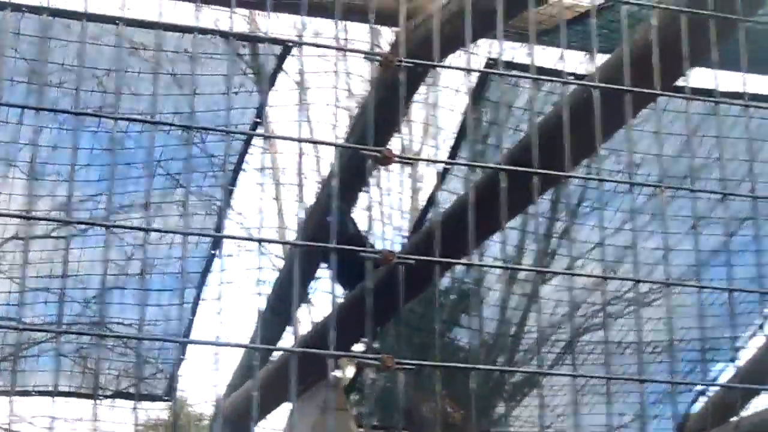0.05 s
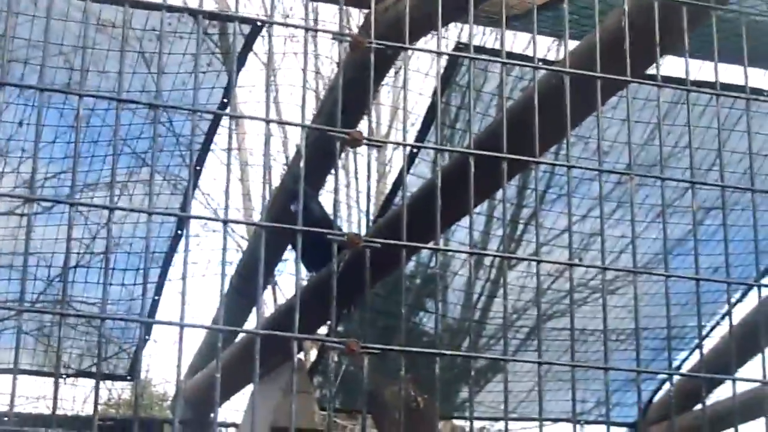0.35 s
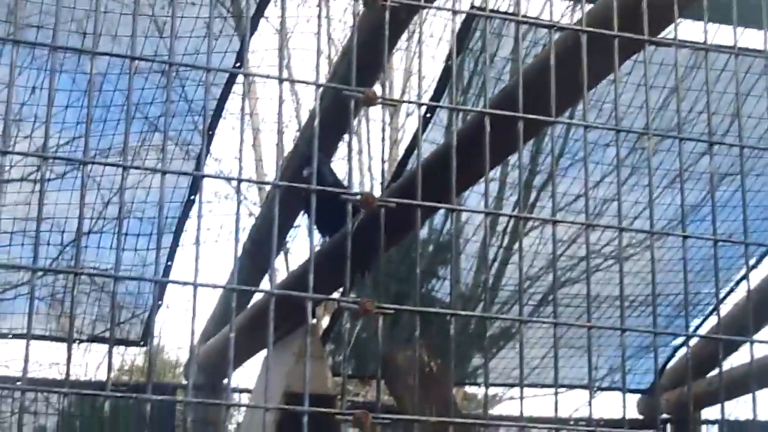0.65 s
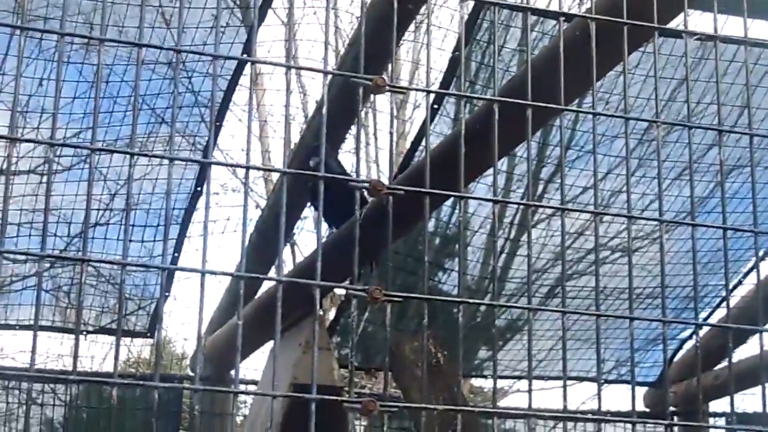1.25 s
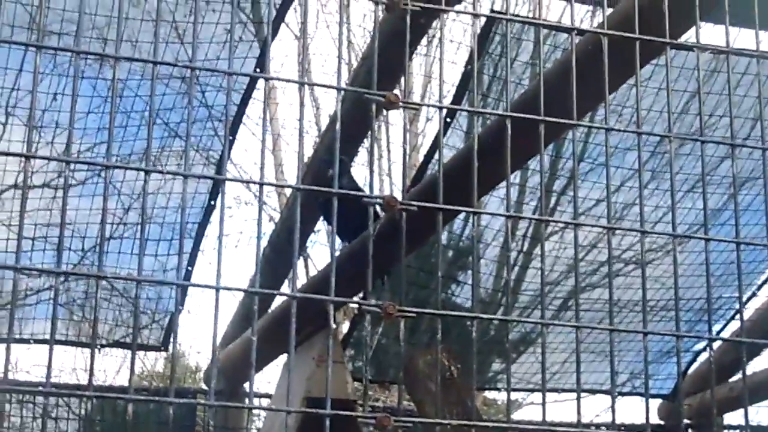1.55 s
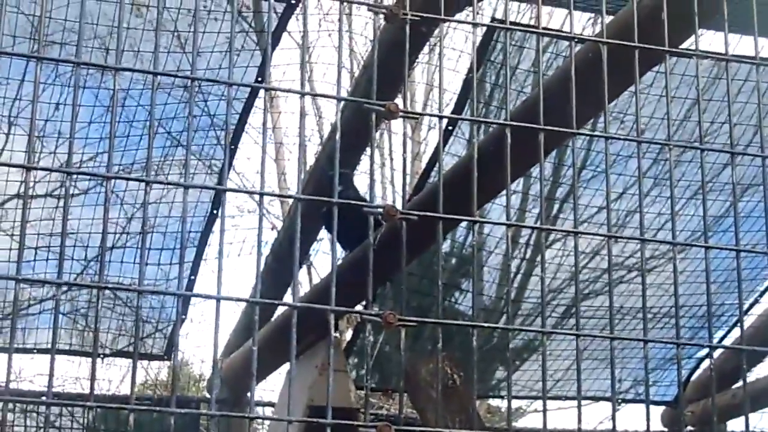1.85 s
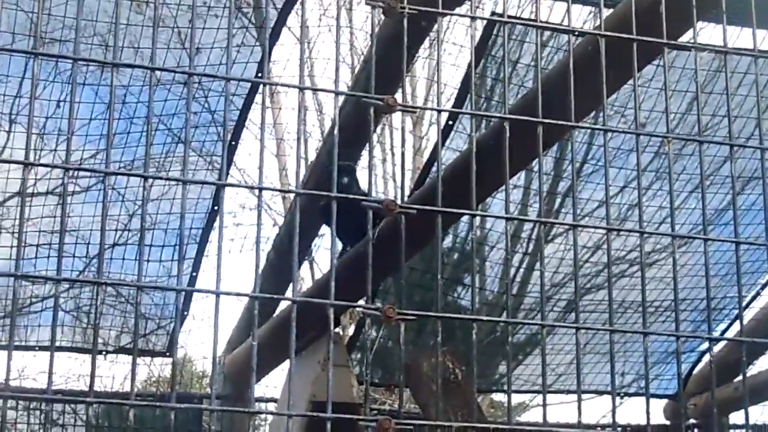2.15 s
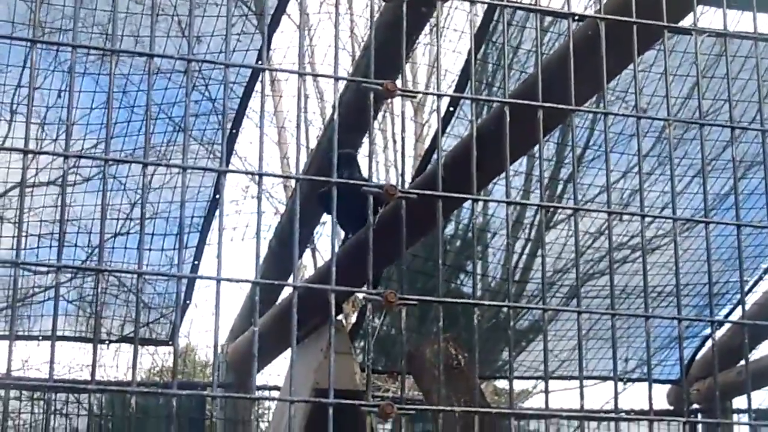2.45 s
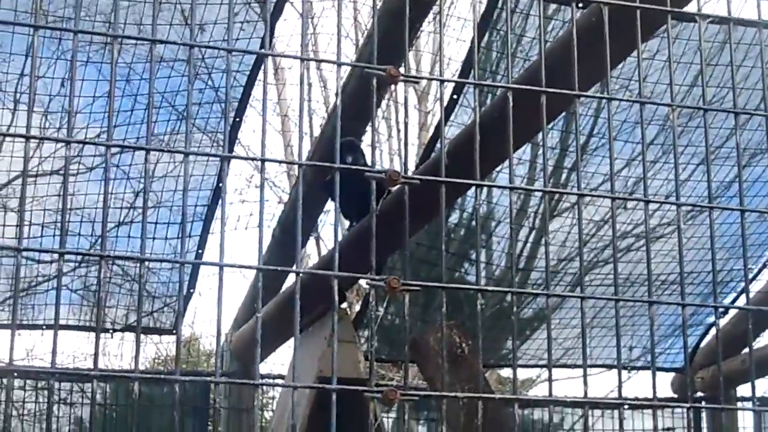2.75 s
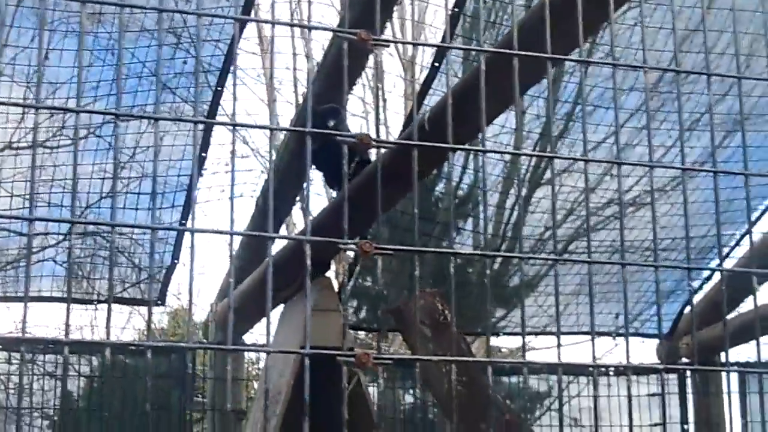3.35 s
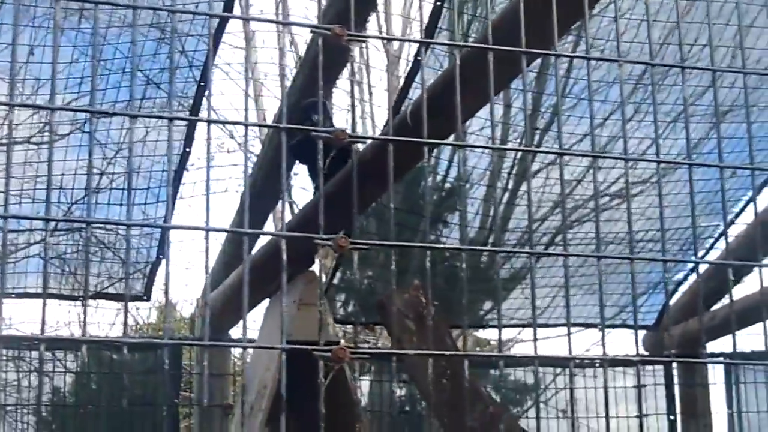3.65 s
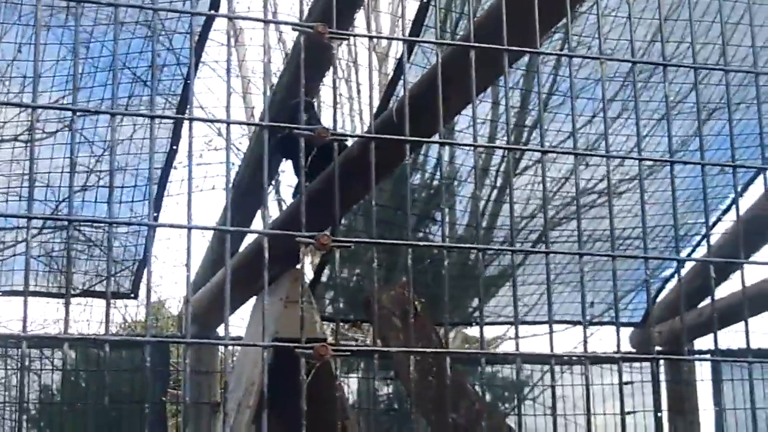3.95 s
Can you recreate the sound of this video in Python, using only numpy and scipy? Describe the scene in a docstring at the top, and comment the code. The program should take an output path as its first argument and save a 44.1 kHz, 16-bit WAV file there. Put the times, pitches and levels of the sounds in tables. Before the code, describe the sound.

A raven gives five short harsh calls outdoors over a quiet background.

```python
"""In an outdoor aviary a raven gives five abrupt, harsh barks, with three soft hoots after the third.
Each bark starts with a faint falling squeak, breaks into a rasp over a strong octave and sags in pitch:
a periodic source, coloured by throat and beak resonances. The enclosure answers with brief reflections.
Beneath lie a quiet hush, faint ticks, one rustle and light wind bumping the microphone."""
import sys
import numpy as np
from scipy import signal
from scipy.fft import rfft, irfft, next_fast_len
from scipy.io import wavfile
from scipy.ndimage import map_coordinates

SR = 44100
rng = np.random.default_rng(int(sys.argv[2]) if len(sys.argv) > 2 else 0)


def materialize(psi):
    """Save the field psi as 16-bit PCM at rate SR to the path in sys.argv[1].

    A 1-D psi becomes a single channel; in a 2-D psi each row is a channel.
    """
    bounded = np.clip(np.atleast_2d(psi).T, -1, 1)
    quanta = np.round(bounded * 32767).astype(np.int16)
    wavfile.write(sys.argv[1], SR, quanta)


N = 176400
TIME = np.arange(N) / SR
BAND_LIMIT_HZ = 14400


def amp(db):
    """Decibels as an amplitude ratio."""
    return 10 ** (np.asarray(db) / 20)


def unit_rms(x):
    """Normalisation to unit power."""
    return x / np.sqrt(np.mean(x ** 2) + 1e-20)


def along(points, hz):
    """Interpolation on a logarithmic frequency axis."""
    knots_hz, values = np.transpose(points)
    return np.interp(np.log(hz + 1), np.log(knots_hz + 1), values)


def wobble(rate, size):
    """Smooth random modulation with `rate` knots a second."""
    return map_coordinates(rng.standard_normal(4096), [np.arange(size) * rate / SR], mode="wrap")


def filtered(x, response):
    """Linear filtering: the spectrum times a frequency response."""
    n = x.shape[-1]
    padded = next_fast_len(n + 8192)
    return irfft(rfft(x, padded) * response(np.fft.rfftfreq(padded, 1 / SR)), padded)[..., :n]


def add(track, start_s, sound):
    """Superposition of a sound on a track."""
    part = track[..., max(round(start_s * SR), 0):][..., :sound.shape[-1]]
    part += sound[..., :part.shape[-1]]


def pan(db):
    """Stereo gains for a level difference, left minus right."""
    return amp(np.array([[db], [-db]]) / 2)


def envelope(t, attack_s, hold_s, release_s, droop_db=0):
    """A smooth rise, a drooping hold, then exponential decay of a further 20 dB per release time."""
    rise = np.sin(np.pi / 2 * np.clip(t / attack_s, 0, 1)) ** 2
    return rise * amp(-droop_db * t / hold_s - 20 * np.maximum(t - hold_s, 0) / release_s)


def coloured_noise(size, response):
    """Spectrally shaped white noise of unit power."""
    return unit_rms(filtered(rng.standard_normal(size), response))


def stereo_noise(response, coherence):
    """Partially coherent noise: the balance of mid and side sets the left-right correlation."""
    angle = lambda hz: np.arccos(np.clip(along(coherence, hz), -1, 1)) / 2
    white = rng.standard_normal((2, N))
    mid, side = filtered(white, lambda hz: response(hz) * [np.cos(angle(hz)), np.sin(angle(hz))])
    return unit_rms(np.array([mid + side, mid - side]))


HUSH_SPECTRUM = [(120, -5.5), (200, -7), (320, -5.5), (430, -7.5), (520, -3.5), (640, -8), (800, -8),
                 (1440, -16.5), (3090, -21), (7000, -25.5), (14000, -28)]  # ambient spectrum: frequency_hz, gain_db
HUSH_DRIFT = [(0, -46.5), (.6, -46.5), (1.3, -48), (3.1, -47.5), (4, -49)]  # slow ambient drift: time_s, level_db
HUSH_COHERENCE = [(200, 0.85), (1000, 0.88), (4000, 0.25), (12000, 0.1)]  # left-right likeness: frequency_hz, correlation
def hush():
    """Distant outdoor noise, nearly steady, whose coherence falls in the treble."""
    response = lambda hz: amp(along(HUSH_SPECTRUM, hz)) * hz ** 2 / (hz ** 2 + 130 ** 2)
    level_db = np.interp(TIME, *np.transpose(HUSH_DRIFT)) + 0.56 * wobble(6.83, N)
    return amp(level_db) * stereo_noise(response, HUSH_COHERENCE) * pan(-1.9)


RUMBLE_SPECTRUM = [(15, -6.5), (30, 4), (70, 1.5), (130, -6.5), (250, -14), (600, -51)]  # wind spectrum: frequency_hz, gain_db
RUMBLE_SWELL = [(0, -47.5), (.8, -44), (2.0, -41), (2.9, -47), (3.4, -45.5), (4, -37.5)]  # wind strength: time_s, level_db
WIND_BUMPS = [(0.871, 0.02, -40, 138, -6), (0.937, 0.036, -45.5, 170, -14.5),
              (1.157, 0.036, -33.5, 142, -9), (1.269, 0.024, -29.5, 187, -5.5),
              (1.636, 0.042, -43, 141, -13), (1.822, 0.023, -36, 160, -5), (1.909, 0.022, -39.5, 148, -12),
              (2.303, 0.006, -30.5, 194, -16), (3.294, 0.0095, -40.5, 121, 23),
              (3.545, 0.026, -33.5, 121, -13.5), (3.656, 0.026, -40, 167, -12.5)]  # pressure pulses: centre_s, length_s, level_db, cutoff_hz, pan_db
def wind():
    """Turbulent pressure on the microphone makes an uneven rumble and short low bumps."""
    level_db = np.interp(TIME, *np.transpose(RUMBLE_SWELL)) + 1.8 * wobble(12, N)
    rumble = stereo_noise(lambda hz: amp(along(RUMBLE_SPECTRUM, hz)), coherence=[(60, 0.61)])
    out = amp(level_db) * rumble * pan(-1.5)
    t = np.arange(-SR // 10, SR // 10) / SR
    for centre_s, length_s, db, cutoff_hz, pan_db in WIND_BUMPS:
        puff = 0.5 * rng.standard_normal((2, len(t))) + rng.standard_normal(len(t))
        puff *= np.exp(-(2 * t / length_s) ** 2)
        puff = filtered(puff, lambda hz: hz / (hz + 70) / np.sqrt(1 + (hz / cutoff_hz) ** 6))
        puff *= np.sqrt(length_s * SR) / np.linalg.norm(puff, axis=1, keepdims=True)
        add(out, centre_s + t[0], amp(db) * puff * pan(pan_db))
    return out


def rustle(centre_s=0.253, length_s=0.07, centre_hz=5460, level_db=-57):
    """Band-pass noise under a Gaussian envelope, heard as a faint high rustle."""
    noise = coloured_noise(N, lambda hz: 1 / (1 + ((hz - centre_hz) / 1800) ** 2))
    return amp(level_db) * noise * np.exp(-(2 * (TIME - centre_s) / length_s) ** 2)


DRY_TICKS = [(0.019, -46), (.139, -45.5), (.339, -46), (0.548, -39.5), (2.756, -46), (2.800, -42)]  # small transients: start_s, level_db
TICK_SPECTRUM = [(500, 9), (2500, 1), (5000, -7), (9000, -2), (14000, -18)]  # their spectrum: frequency_hz, gain_db
def ticks(decay_s=0.0053):
    """Exponentially damped noise bursts, heard as dry ticks."""
    out, t = np.zeros(N), np.arange(SR // 30) / SR
    for start_s, level_db in DRY_TICKS:
        noise = coloured_noise(len(t), lambda hz: amp(along(TICK_SPECTRUM, hz)))
        add(out, start_s, amp(level_db) * noise * np.exp(-t / decay_s))
    return out


REVERB_TIMES = [(200, 0.14), (550, 0.59), (1200, 0.86), (4000, 1), (8000, 0.17), (14000, 0.11)]  # decay of the enclosure: frequency_hz, t60_s
TAIL_SPECTRUM = [(200, -20), (550, 1), (1150, -3.5), (2500, -7), (4000, -12.5), (8000, 4.5), (14000, 15)]  # diffuse field: frequency_hz, gain_db
REFLECTIONS = [(.0095, -29), (.021, -22.5), (.034, -31), (.047, -22)]  # echoes off beams and walls: delay_s, gain_db
def aviary(sound, tail_gain_db=-18.5, build_up_s=0.0066, echo_cutoff_hz=4600):
    """Convolution with an impulse response: direct sound, dull early reflections and a diffuse tail."""
    hz, t, spectra = signal.stft(rng.standard_normal((2, SR * 3 // 4)), SR, nperseg=256)
    decay = amp(-60 * t / along(REVERB_TIMES, hz)[:, None])
    tail = signal.istft(spectra * decay * (1 - np.exp(-t / build_up_s)), SR, nperseg=256)[1]
    mid, side = filtered(tail / np.linalg.norm(tail[0]), lambda f: amp(along(TAIL_SPECTRUM, f)))
    side = filtered(side, lambda f: f / (f + 2500))  # the bass stays central
    echoes = np.zeros(len(mid))
    for delay_s, gain_db in REFLECTIONS:
        add(echoes, delay_s, amp([gain_db]))
    echoes = filtered(echoes, lambda f: 1 / (1 + 1j * f / echo_cutoff_hz))
    response = amp(tail_gain_db) * np.array([mid + side, mid - side]) + echoes
    response[:, 0] += 1  # direct path
    return signal.fftconvolve(sound[None], response, axes=1)


HOOT_NOTES = [(2.708, 0.045, 500.6, -31), (2.752, 0.043, 509, -27), (2.797, .040, 507.4, -27.5)]  # soft calls: start_s, length_s, pitch_hz, level_db
def hoots(arch=0.02, rise=0.03, overtones_db=(-26.5, -43, -38)):
    """Nearly sinusoidal vibration: weak harmonics on a pitch that arches and rises slightly."""
    out = np.zeros((2, N))
    for start_s, length_s, pitch_hz, level_db in HOOT_NOTES:
        progress = np.linspace(0, 1, int(length_s * SR))
        arc = np.abs(np.sin(np.pi * progress))
        pitch = pitch_hz * (1 + arch * (arc - 2 / np.pi) + rise * (progress - 0.5))
        phase = 2 * np.pi * np.cumsum(pitch) / SR
        tone = np.sin(phase) + sum(amp(db) * np.sin(k * phase) for k, db in enumerate(overtones_db, 2))
        add(out, start_s, aviary(np.sqrt(2) * amp(level_db) * tone * arc ** 0.65))
    return out


THROAT_FORMANTS = [(150, -19), (400, -24), (800, -12), (1400, -9.5), (1750, -1.5), (2250, -5.5),
                   (2650, -15), (3300, -3), (4500, -3), (5200, -13.5), (5900, -11), (6900, -13.5),
                   (8000, -14.5), (8800, -19.5), (9800, -15.5), (11300, -12.5), (12500, -21.5),
                   (14200, -24)]  # vocal tract response: frequency_hz, gain_db
def vocal_tract(beak_hz, upper_hz, upper_db, treble_db):
    """The filter of the source-filter model: throat formants, two resonance peaks and a treble shelf."""
    def response(hz):
        beak = 10.5 / (1 + ((hz - beak_hz) / 170) ** 2)
        upper = upper_db / (1 + ((hz - upper_hz) / 360) ** 2)
        shelf = treble_db * np.clip((hz - 4500) / 2500, 0, 1)
        return amp(along(THROAT_FORMANTS, hz) + beak + upper + shelf)
    return response


SQUEAK_FORMANTS = [(1200, -28.5), (1500, -39), (1900, -47), (2600, -52), (3300, -44), (4500, -38.5),
                   (5500, -50.5), (7500, -56), (11000, -58.5), (14000, -68)]  # resonances shaping the squeak: frequency_hz, level_db
def squeak(length_s, from_hz=3450, to_hz=1185, fall_s=0.0105, hiss_db=-41):
    """A falling whistle whose harmonics flare as they cross throat resonances."""
    t = np.arange(SR // 16) / SR
    pitch = to_hz + (from_hz - to_hz) / (1 + (t / fall_s) ** 3)
    pitch *= 1 + 0.042 * wobble(256, len(t))
    phase = 2 * np.pi * np.cumsum(pitch) / SR
    tone = np.zeros(len(t))
    for k in range(1, 7):
        level_db = along(SQUEAK_FORMANTS, k * pitch) + 2.7 * wobble(214, len(t))
        tone += amp(level_db) * (k * pitch < BAND_LIMIT_HZ) * np.sin(k * phase)
    hiss = coloured_noise(len(t), lambda hz: amp(along(THROAT_FORMANTS, hz)))
    hiss *= amp(hiss_db) * np.minimum(t / length_s, 1) ** 2  # a faint hiss swells just before the bark
    return (np.sqrt(2) * tone + hiss) * envelope(t, 0.0033, length_s + 0.001, 0.0025)


def rasp(t, pitch, phase, tract, length_s, clearing_s=0.01):
    """Roughness from amplitude modulation: uneven harmonics and noise pulsed once a cycle."""
    overtones = np.zeros(len(t))
    for k in range(3, 28):
        flicker = amp(4 * wobble(90, len(t)))
        overtones += tract(k * pitch) * flicker * np.cos(k * phase + rng.uniform(0, 2 * np.pi))
    overtones /= np.std(overtones[t < length_s])
    noise = unit_rms(filtered(rng.standard_normal(len(t)) * (1 + np.cos(phase)) ** 2, tract))
    noise_share = 0.08 + 0.61 * np.exp(-t / clearing_s)  # noisiest as the voice breaks in
    blend = np.sqrt(1 - noise_share) * overtones + np.sqrt(noise_share) * noise
    return blend * envelope(t, 0.0042, length_s, 0.023, droop_db=5.5)


def bark(rasp_s, first_hz, last_hz, octave_db, octave_hold_s, rasp_db, beak_hz, upper_hz, upper_db,
         treble_db, catch_s, catch_db, sag_s=0.016, jitter=0.013, shimmer_db=1.0):
    """A harmonic series on one sagging pitch: weak fundamental, strong octave and filtered rasp."""
    t = np.arange(SR // 8) / SR
    pitch = last_hz + (first_hz - last_hz) * np.exp(-t / sag_s)
    phase = 2 * np.pi * np.cumsum(pitch * (1 + jitter * wobble(600, len(t)))) / SR
    tract = vocal_tract(beak_hz, upper_hz, upper_db, treble_db)
    rough = amp(rasp_db) * rasp(t, pitch, phase, tract, rasp_s)
    octave = np.sqrt(2) * amp(octave_db) * np.sin(2 * phase)
    octave *= envelope(t, 0.014, octave_hold_s, 0.029, droop_db=2.5)
    fundamental = np.sqrt(2) * amp(-28.5) * np.sin(phase) * envelope(t + 0.0042, 0.018, 0.052, 0.026)
    catch = amp(-catch_db * np.exp(-((t - catch_s) / 0.0024) ** 2))  # a brief dip in the voice
    return (catch * (rough + octave) + fundamental) * amp(shimmer_db * wobble(500, len(t)))


# Harsh calls: start_s, rasp_s, first_hz, last_hz, octave_db, octave_hold_s, rasp_db,
# beak_hz, upper_hz, upper_db, treble_db, catch_s, catch_db
BARK_CALLS = [(2.116, .025, 692, 495.4, -8.5, 0.016, -20, 3490, 2040, 7, 4, 0.015, 10),
              (2.356, 0.029, 627, 529.8, -10, 0.022, -16, 3860, 4600, 5.5, -1, 0.02, 7.5),
              (2.542, 0.023, 644, 543, -8.5, 0.0081, -15.5, 3570, 6500, 8, 1, 0.015, 7.5),
              (3.682, 0.028, 699.4, 507.3, -13, 0.025, -17.5, 3530, 5500, 7.5, -1.5, 0.0156, 8),
              (3.912, 0.031, 691.5, 533, -9.5, 0.021, -17.5, 3680, 5430, 8.5, -2, .018, 5.5)]
def barks(squeak_s=0.026):
    """Each bark and its onset transient, the squeak, excite the enclosure's reverberation."""
    out = np.zeros((2, N))
    for start_s, *shape in BARK_CALLS:
        add(out, start_s - squeak_s, aviary(squeak(squeak_s)))
        add(out, start_s, aviary(bark(*shape)))
    return out


RAVEN_DIRECTION = [(500, -3), (1200, -3), (3000, -2.5), (5000, -3), (9000, -1)]  # stereo balance: frequency_hz, left_minus_right_db
def raven():
    """A level difference between the channels places the calls a little to the right."""
    return filtered(barks() + hoots(), lambda hz: amp(np.outer([0.5, -0.5], along(RAVEN_DIRECTION, hz))))


def scene():
    """Independent sources add by linear superposition."""
    return raven() + ticks() + rustle() + wind() + hush()


def record(dry):
    """An ideal low-pass filter removes everything above the band limit."""
    return filtered(dry, lambda hz: hz < BAND_LIMIT_HZ)


dry = scene()
out = record(dry)
materialize(out)
```